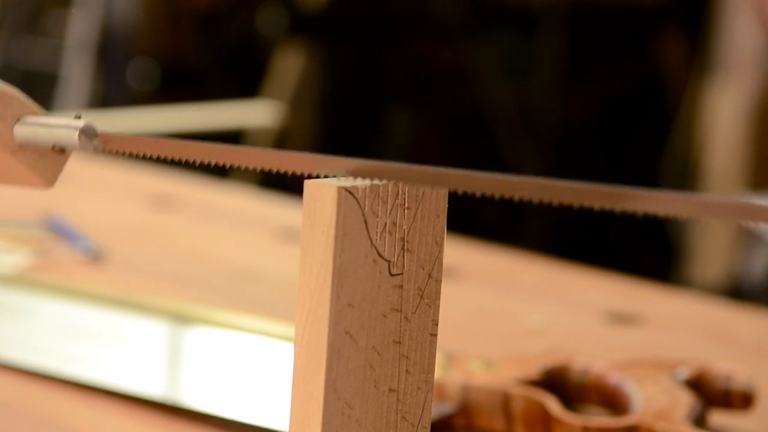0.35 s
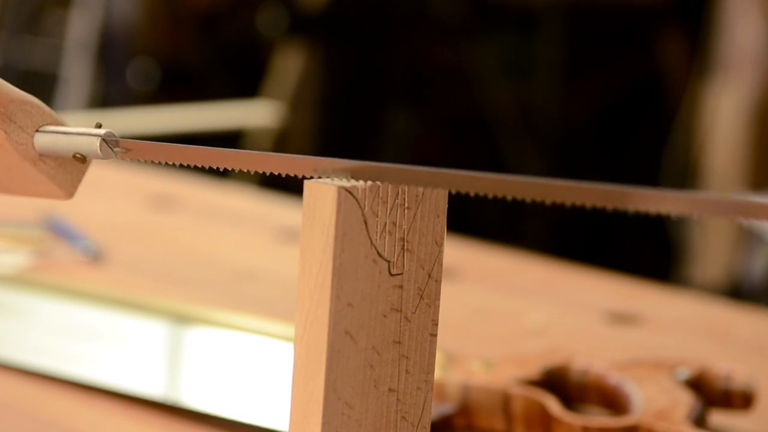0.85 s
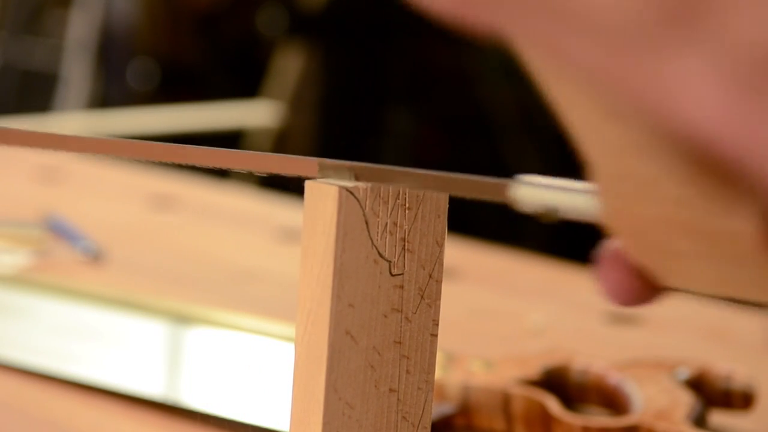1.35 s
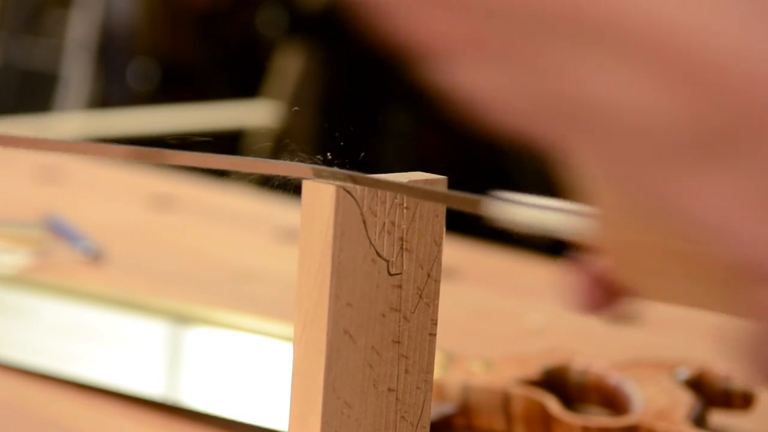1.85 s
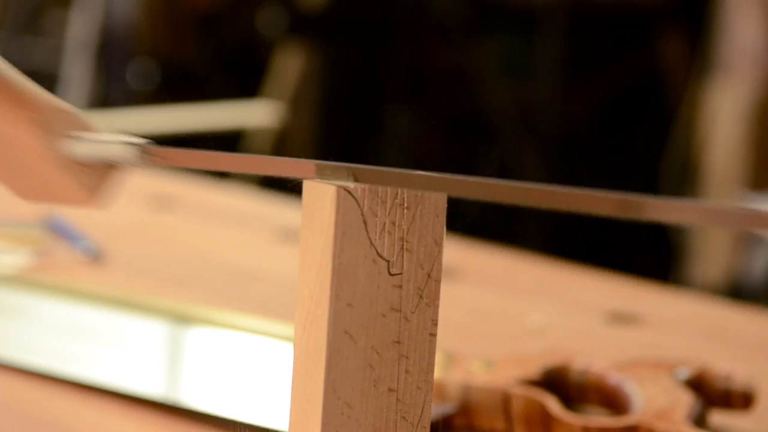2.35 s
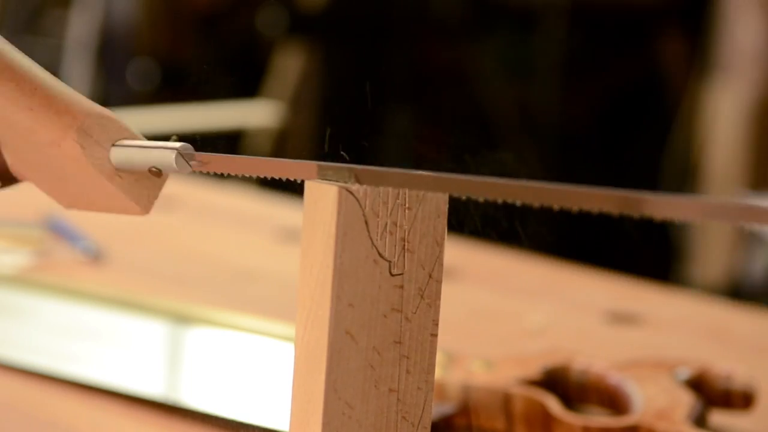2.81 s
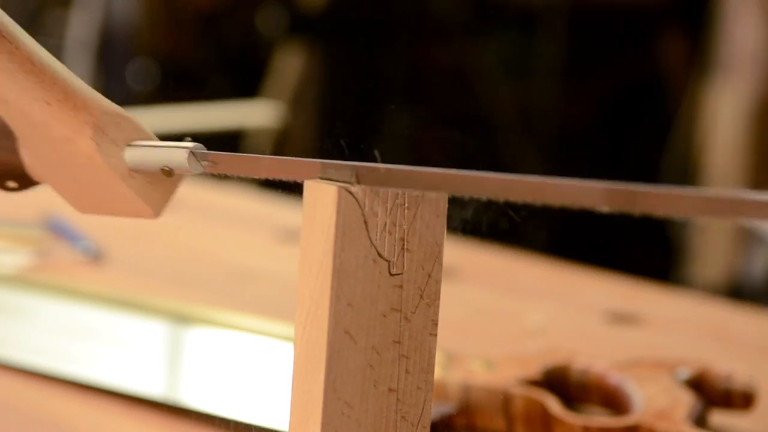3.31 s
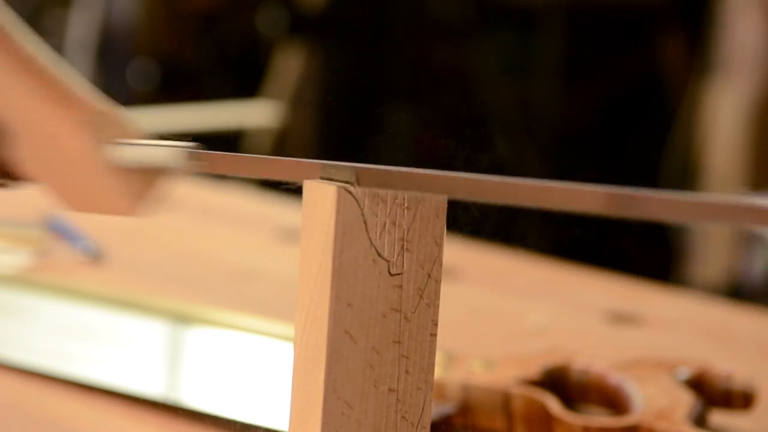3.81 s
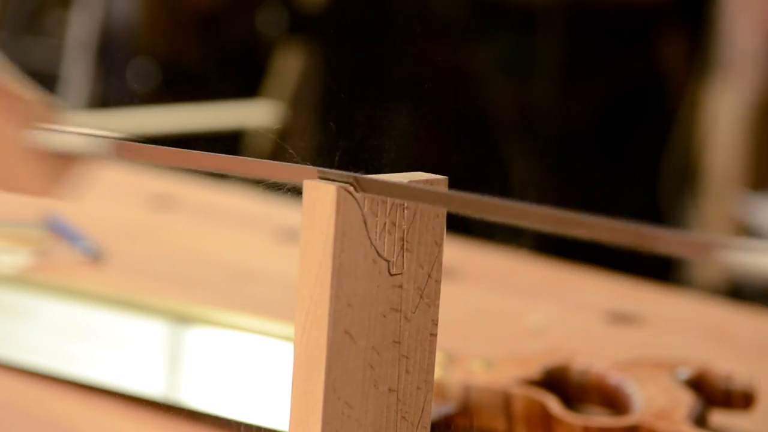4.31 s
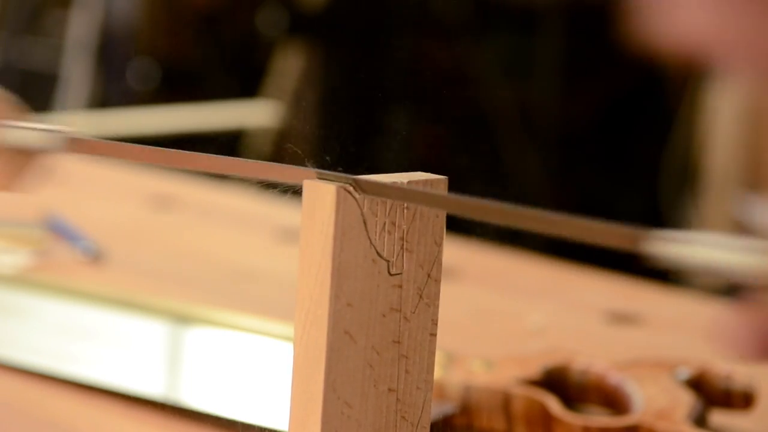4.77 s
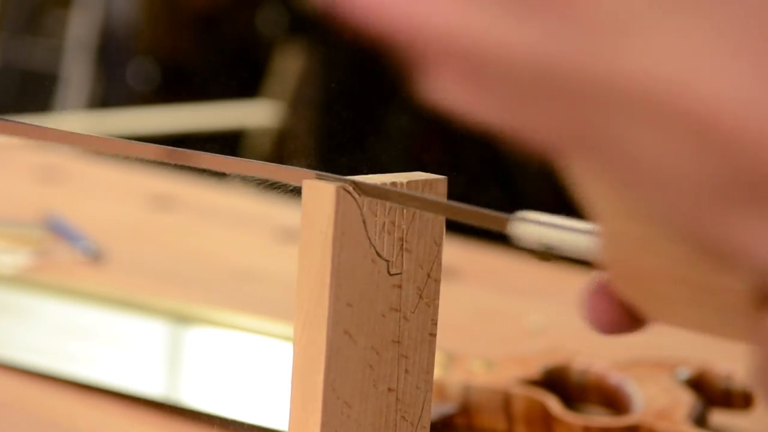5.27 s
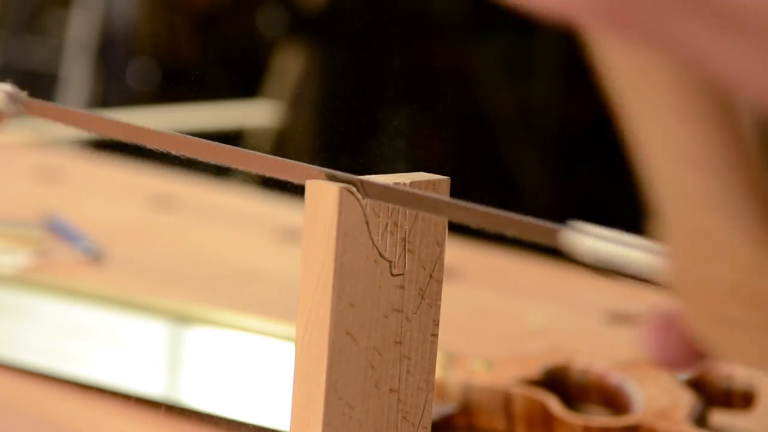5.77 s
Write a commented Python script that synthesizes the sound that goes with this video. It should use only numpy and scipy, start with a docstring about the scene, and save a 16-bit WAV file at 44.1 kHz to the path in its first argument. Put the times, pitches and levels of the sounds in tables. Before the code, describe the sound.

Light steel ticks and soft wood contact come first over a low, quiet shop hum. Then a saw bites a board in alternating push and pull strokes, slow at first and soon quick and regular. Pushes drone and rasp more; pulls are harder, with buzzing wood and less hiss. Small snags click at some turns. Close, fairly dry stereo sound with short room reflections and a low wind-like thump around two seconds.

```python
"""In a workshop, close to a two-port camera microphone, a hand bow saw is laid on the end of a clamped board.
It is nudged into place with light ticks; after a second the strokes begin, push and pull in turn.
Each tooth strikes at a rate that follows the blade speed and rings filters for the modes of board and frame;
shaped noise makes the torn fibres rasp on the steel; narrow bands sing and broad ones scrape airily at times.
Low noise from the arm's moving air buffets the ports, mostly near two seconds; the shop hums faintly all along."""
import sys
import numpy as np
from scipy import signal
from scipy.fft import rfft, irfft, next_fast_len
from scipy.io import wavfile
from scipy.ndimage import uniform_filter1d, map_coordinates

SR = 44100
rng = np.random.default_rng(int(sys.argv[2]) if len(sys.argv) > 2 else 0)


def log_audio(samples):
    """Write samples as a 16-bit WAV file to the path given in sys.argv[1]."""
    # one column per channel
    frames = np.atleast_2d(samples).T
    # limit to full scale, then quantise
    limited = np.clip(frames, -1, 1)
    pcm = np.round(limited * 32767).astype(np.int16)
    wavfile.write(sys.argv[1], SR, pcm)


def linear_from_db(decibels):
    """Turn decibels (scalar or array-like) into linear amplitude factors; 0 gives 1."""
    return 10 ** (np.asarray(decibels, float) / 20)


N = 259902  # samples, 5.9 s

# A tooth snags on the wood. Each row: time in seconds, starting level in dB before the filters.
CATCHES = [(0.055, -31), (0.7677, -54), (0.9944, -32), (1.357, -30), (1.7673, -20.5), (2.078, -27),
           (2.6617, -20), (3.166, -33), (3.6411, -24), (4.087, -33), (5.403, -37), (5.5966, -23),
           (5.8141, -32)]


def saw():
    """The teeth drive the board's drone, the frame's modes and the blade's rasp; returns two channels."""
    low_db, drone_db, rasp_db, high_db = levels()
    count = teeth_passed()
    snag = snags(CATCHES, t60=0.0064)
    clean = bites(count, jitter=0.035, scatter_db=2.5)
    blows = torn(clean, 0.2)
    drone = linear_from_db(drone_db) * board_drone(torn(clean, 0.5))
    low = linear_from_db(low_db + 0.5) * frame_low(blows)
    buzz = linear_from_db(low_db - 5.5 + 2.5 * wobble(45)) * wood_buzz(clean)
    high = linear_from_db(high_db) * frame_high(blows)
    grind = linear_from_db(0.82 * high_db + 0.27 * low_db - 3.0) * chewing(count)
    return drone + low + buzz + high + grind + knocks(snag) + rasp(count, rasp_db, snag) + singing()


# The turns of the blade. Each row: time in seconds, resting level in dB before each layer's own offset,
# pause in seconds until the teeth grip again.
TURNS = [(0.974, -63, 0.019), (1.322, -61, 0.018), (1.742, -51.5, 0.02), (2.065, -49, 0.021),
         (2.378, -40.5, 0.0046), (2.64, -47, 0.018), (2.9, -35.5, 0.014), (3.152, -48.5, 0.014),
         (3.381, -41, 0.0011), (3.627, -47.5, 0.015), (3.847, -35.5, 0.00031), (4.073, -47.5, 0.0071),
         (4.293, -37, 0.014), (4.54, -47.5, 0.00058), (4.753, -40, 0.0037), (4.965, -42, 0.0041),
         (5.18, -41.5, 0), (5.384, -38.5, 0.016), (5.613, -51, 0.011), (5.805, -46, 0.006), (6.0, -38, 0)]


def stroke_now():
    """For every sample: the number of the stroke and the share of it that has passed."""
    turn_s = np.array(TURNS)[:, 0]
    place = np.interp(np.arange(N) / SR, turn_s, np.arange(len(TURNS)))
    k = np.minimum(place.astype(int), len(STROKES) - 1)
    return k, place - k


# Share of each stroke at which the blade is fastest, one number a stroke.
FASTEST = [0.29, .5, .45, 0.3, 0.36, 0.35, 0.44, 0.3, 0.43, 0.28, 0.45, 0.42, 0.43, .35, 0.45, 0.39, 0.4,
           .35, 0.31, 0.33]
# Push, then pull. Each row: how far past the turns the arch of speed reaches before and after top speed,
# as multiples of the way to the turn.
SPEED_REACH = [(1.3, 1.15), (1.3, 1.55)]


def teeth_passed():
    """Running count of teeth: in each stroke the blade speeds up and slows down along an arch."""
    k, share = stroke_now()
    fastest = np.array(FASTEST)[k]
    before, after = np.array(SPEED_REACH)[k % 2].T
    way = toward_turn(share, fastest) / np.where(share > fastest, after, before)
    arch = np.sqrt(np.clip(1 - way ** 2, 0, 1))
    teeth_per_s = np.maximum(60.0, np.array(STROKES)[k, 1] * arch)
    return np.cumsum(teeth_per_s * (1 + 0.01877 * wobble(60))) / SR


# One stroke from each turn to the next, push and pull in turn. Each row: share of the stroke at which the
# arm eases off, top teeth per second before a slight waver, bite in dB, board drone in dB over the bite,
# rasp in dB over the bite.
STROKES = [(0.49, 230, -26.5, 5.5, -11), (0.64, 288, -23.5, 3.5, -19.5), (0.6, 263, -19.5, 3, -14),
           (0.44, 343, -21.5, 2.5, -17), (0.56, 339, -19.5, 8.5, -10), (0.59, 289, -15, 2.0, -20.5),
           (0.55, 361, -19.5, 2.5, -10), (0.64, 360, -17, -2.5, -18), (0.59, 360, -22.5, 6, -8),
           (0.6, 350, -17.5, -1, -17), (0.56, 390, -17.5, 6.5, -11.5), (0.58, 345, -13.5, 1, -17.5),
           (0.63, 358, -20.5, 8.5, -12), (0.6, 264, -16.5, 2.5, -19), (0.58, 269, -20, 3.5, -13),
           (0.51, 260, -15.5, 4, -19.5), (0.54, 280, -17.5, 5.5, -15), (0.54, 266, -19, 3.5, -19.5),
           (0.45, 340, -18.5, 6.5, -13.5), (0.43, 284, -22.5, 8, -18)]
# How squarely each layer sets in and dies away. Each row: power of the way to the turn for push in,
# push out, pull in, pull out, then the layer's offset in dB at rest.
LOW_SHAPE = (4.3, 1.36, 5.2, 1.81, 2.1)
DRONE_SHAPE = (5.3, 1.62, 6.8, 3.24, 10.2)
RASP_SHAPE = (5.0, 0.64, 7.5, 0.6, -13.5)
HIGH_SHAPE = (5.5, 0.68, 4, 0.9, -8)
# The blade is laid on the wood and nudged into place. Each row: time in seconds, bite in dB,
# board drone in dB over the bite, rasp in dB over the bite.
LAYING = [(0.0, -42.5, 1.5, -16.5), (0.078, -44.5, 15.5, -21), (0.134, -63, 17.5, -10),
          (0.251, -64.5, 4, -8), (0.694, -71, 14, -11.5), (0.745, -71, 10, -8), (0.77, -58, 13, -9),
          (0.83, -65.5, 10, -9.5), (0.96, -77, 4, -10)]
# The board booms or falls back for a moment. Each row: time in seconds, change of the drone in dB.
BOOMS = [(1.19, 6), (1.509, 7), (1.925, 10), (2.15, 5.5), (2.511, 6.5), (2.835, 2.5), (2.939, 11.5),
         (3.067, 10.5), (3.332, 5), (3.552, 6), (3.8, 3), (3.986, 0), (4.2, 4), (4.465, -3), (4.705, 3),
         (4.835, 4.5), (4.888, 9.5), (5.1, 3.5), (5.305, 0.5), (5.53, 5), (5.69, 3.5), (1.125, -19),
         (2.799, -15), (3.015, -4.5), (3.235, 2), (3.745, -12), (3.93, -7), (4.655, -9), (5.07, -8.5),
         (5.49, -8)]
# The teeth skid before they dig in fully. Each row: first touch in seconds, full grip in seconds,
# change of all the stroke's layers in dB before smoothing.
SKIDS = [(2.089, 2.107, -5), (3.636, 3.674, -5), (4.093, 4.114, -7), (5.821, 5.841, -2.5)]
# Hiss of the blade still sliding at the early turns: rasp in dB over its usual rest, one number a turn.
SLIDING = [.1, 1.5, 4.6, 6, 3]
# Change of the rasp from start to end of a stroke in dB: push, pull.
FADES_DB = (-1, -3.5)


def levels():
    """Low, drone, rasp and high layers in dB: full in mid stroke, at rest from each turn until the grip."""
    boom_s, grip_s = 0.014, 0.0036
    t = np.arange(N) / SR
    k, share = stroke_now()
    eases, _, bite_db, drone_db, rasp_db = np.array(STROKES)[k].T
    eases = eases.clip(0.1, 0.9)
    late = (share > eases).astype(int)
    nearest_turn = k + late
    turn_s, rests_db, pause_s = np.array(TURNS).T
    way = toward_turn(share, eases)
    way[t < turn_s[k] + pause_s[k]] = 1
    way = uniform_filter1d(way, int(grip_s * SR))

    drone_db = drone_db + sum(db * np.exp(-0.5 * ((t - s) / boom_s) ** 2) for s, db in BOOMS)
    high_db = -5 + 0.27 * (rasp_db + 17)  # the high modes grow with a rough tear
    rasp_db = rasp_db + np.array(FADES_DB)[k % 2] * (share - 0.5)
    skid_db = sum(db * ((t > start) & (t < end)) for start, end, db in SKIDS) * 1.0
    skid_db = uniform_filter1d(skid_db, int(grip_s * SR))
    slide_db = np.pad(SLIDING, (0, len(TURNS)))[nearest_turn]
    laid_db, laid_drone_db, laid_rasp_db = curves(LAYING)

    def layer(over_db, shape, laid_over_db, slid_db=0):
        """One layer's level: the stroke's, or the laying's before the first turn."""
        full_db = bite_db + over_db
        rest_db = rests_db[nearest_turn] + slid_db + shape[-1]
        power = np.array(shape)[2 * (k % 2) + late]
        stroke_db = skid_db + full_db + (rest_db - full_db) * way ** power
        return np.where(t > turn_s[0], stroke_db, laid_db + laid_over_db)

    return [layer(0, LOW_SHAPE, 0), layer(drone_db, DRONE_SHAPE, laid_drone_db),
            layer(rasp_db, RASP_SHAPE, laid_rasp_db, slide_db), layer(high_db, HIGH_SHAPE, -17)]


# Left-set teeth over right-set teeth in dB: push, pull.
SET_DB = (7.5, 2.5)


def bites(count, jitter, scatter_db):
    """One blow per tooth, uneven in time and size, left-set and right-set teeth unlike."""
    tooth = np.arange(1, int(count[-1]))
    chance = rng.standard_normal((len(tooth), 2))
    at = np.searchsorted(count, tooth + jitter * chance[:, 0]).clip(0, N - 1)
    stroke = stroke_now()[0][at]
    set_db = np.array(SET_DB)[stroke % 2] * (tooth % 2 - 0.5)
    return unit(np.bincount(at, linear_from_db(scatter_db * chance[:, 1] + set_db), N))


def torn(blows, share):
    """Blows over the noise of tearing fibres, which holds this share of the power."""
    return np.sqrt(1 - share) * blows + np.sqrt(share) * rng.standard_normal(N)


# Bending of the clamped board. Each row: frequency in Hz, width in Hz, relative level in dB.
BOARD = [(206, 14.4, -13), (239.5, 24.6, -3), (251.7, 18, 3.5), (325.8, 15, -2)]


def board_drone(drive):
    """The board's bending modes, favoured around 280 Hz, ring together as a drone."""
    modes = [lambda f, one=one: one(f) * mode(f, 280, 210) for one in resonances(BOARD)]
    return held(rung(drive, modes, drift_db=4.5, rate=40), firm=0.76, span_s=0.044)


# Higher modes of board and saw frame. Each row: frequency in Hz, width in Hz, relative level in dB.
FRAME = [(448.1, 12, 1.5), (506, 35.7, 4), (585, 10.3, 3.5), (655, 86, -7), (785.6, 19, -3), (857, 17, -8),
         (940, 24, -7.5), (981.4, 5.3, 0), (1026, 17, -10), (1190, 400, -22), (1388, 27, -15.5),
         (1600, 92, -14), (1734, 43, -5), (1832, 63, -8), (2055, 234, -16.5), (2090, 270, -22),
         (2557, 75, -16), (2752, 81, -9.5), (2782, 190, -12), (3036, 71, -21.5)]


def frame_low(drive):
    """The nine lowest modes of board and frame, rung by the teeth."""
    return held(rung(drive, resonances(FRAME)[:9], drift_db=3.5, rate=22), firm=0.71, span_s=0.056)


def frame_high(drive):
    """The modes above the nine lowest, less firmly damped."""
    return held(rung(drive, resonances(FRAME)[9:], drift_db=4, rate=8), firm=0.25, span_s=0.023)


def knocks(snag):
    """A snagging tooth knocks all the higher modes of board and frame at once."""
    return filtered(linear_from_db(21.5) * snag, lambda f: sum(one(f) for one in resonances(FRAME)))


# Broad response of the wood to each tooth. Each row: frequency in Hz, width in Hz of each of two
# resonances in a row, relative level in dB.
BODY = [(566.5, 330, 7), (980, 520, -5.5), (1450, 660, -11.5)]


def wood_buzz(clean):
    """The bare blows of the teeth through the broad response of the wood."""
    return unit(filtered(clean, lambda f: sum(linear_from_db(db) * mode(f, hz, width) ** 2 for hz, width, db in BODY)))


# Coarse chewing of the wood. Each row: frequency in Hz, relative spectrum level in dB.
GRIND = [(500, -14), (900, -2.5), (1400, 0.5), (2300, -4), (3600, -9), (5500, -26)]


def chewing(count):
    """Strongly pulsing, gritty tearing noise, about half of it shared by the two ports."""
    noise = tearing(count, pulse_db=3.5, grit_db=4, patchy_db=3, apart=0.95)
    spectrum = [(200, -90)] + GRIND + [(9000, -92)]
    return unit(filtered(noise, lambda f: linear_from_db(along(spectrum, f))))


# Colour of the rasp. Each row: frequency in Hz, relative spectrum level in dB.
RASP = [(1470, -42), (2500, -4.5), (2780, 0.5), (3480, -23), (3730, -8.5), (5110, -6), (5910, -9),
        (12300, -20.5), (15700, -33)]
# Ringing of the steel blade. Each row: frequency in Hz, width in Hz, level in dB over the rasp before a
# common 3 dB cut.
BLADE = [(3756, 41, 0), (4150, 52, -5), (4480, 86, -2.5), (5030, 91, -2.5), (5380, 36, 1.5),
         (8100, 1330, 2.5), (10540, 64, 5.5), (12100, 230, 2)]
# The steel ticks lightly. Each row: time in seconds, starting level in dB before a lift and the filters.
TICKS = [(.02, -37), (.057, -36), (.118, -33), (.296, -48), (.371, -37), (.535, -44), (1.212, -24),
         (1.345, -31), (1.414, -25), (1.782, -19), (2.099, -27)]


def rasp(count, rasp_db, snag):
    """Torn fibres, snags and ticks scrape the steel, whose own modes ring along."""
    def colour(f):
        return linear_from_db(along([(1500, -54)] + RASP, f))

    fibres = tearing(count, pulse_db=2.0, grit_db=2.3, patchy_db=1.5, apart=0.55)
    scrape = linear_from_db(rasp_db + 16) * fibres + linear_from_db(5.0) * snag + linear_from_db(5.5) * snags(TICKS, t60=0.0033)
    blade = [lambda f, hz=hz, width=width, db=db: linear_from_db(db) * mode(f, hz, width) * colour(f)
             for hz, width, db in BLADE]
    return filtered(scrape, colour) + linear_from_db(-3) * rung(scrape, blade, drift_db=5, rate=7)


def tearing(count, pulse_db, grit_db, patchy_db, apart):
    """Noise that swells at every tooth, crackles and flares in patches; each port gets partly its own."""
    swell_db = pulse_db * np.cos(2 * np.pi * count) + grit_db * wobble(900)
    swell_db = swell_db + 2.1 * wobble(70) + 1.27 * wobble(170)
    noise = rng.standard_normal(N) + apart * rng.standard_normal((2, N))
    z = signal.stft(noise, nperseg=512)[2]
    # patches: random gains smoothed over frequency and time
    patches = uniform_filter1d(rng.standard_normal(z.shape[1:]), 8, 0)
    patches = uniform_filter1d(patches, 10, 1)
    patchy = signal.istft(z * linear_from_db(patchy_db * unit(patches)), nperseg=512)[1][:, :N]
    return unit(linear_from_db(swell_db) * patchy)


def snags(events, t60):
    """Single sharp blows, each a few ms of dying noise."""
    out, t = np.zeros(N + SR), np.arange(SR // 50) / SR
    for s, db in events:
        out[round(s * SR):][:len(t)] += linear_from_db(db - 60 * t / t60) * rng.standard_normal(len(t))
    return out[:N]


# The blade sings or scrapes airily. Each row: start in seconds, end in seconds, frequency in Hz, width in
# Hz of each of two resonances in a row, level in dB at the top of the swell before flutter.
SING = [(.08, .66, 1850, 260, -71), (.02, .42, 4060, 400, -75), (1.03, 1.13, 5200, 400, -41),
        (1.4, 1.49, 5000, 350, -38), (1.66, 1.79, 8500, 8000, -49), (1.99, 2.11, 9500, 8000, -53),
        (3.243, 3.262, 3850, 450, -23), (3.27, 3.29, 3750, 150, -32), (3.96, 4.04, 5000, 80, -36),
        (5.21, 5.31, 10600, 250, -43)]


def singing():
    """Narrow or broad fluttering noise bands under a smooth swell."""
    t, out = np.arange(N) / SR, np.zeros(N)
    for start, end, hz, width, db in SING:
        share = np.clip((t - start) / (end - start), 0, 1)
        swell = np.abs(np.sin(np.pi * share)) ** 0.5
        band = unit(filtered(rng.standard_normal(N), lambda f: mode(f, hz, width) ** 2))
        out += linear_from_db(db + 4.4 * wobble(45)) * swell * band
    return out


def rung(drive, modes, drift_db, rate):
    """The moving point of contact feeds each mode more or less from moment to moment."""
    return sum(filtered(linear_from_db(drift_db * wobble(rate)) * drive, one) for one in modes)


def held(x, firm, span_s):
    """The pressing blade damps the wood: strong ringing is evened out over a short span."""
    power = uniform_filter1d(np.mean(np.atleast_2d(unit(x)) ** 2, 0), int(span_s * SR))
    return unit(x * (np.abs(power) + 0.023) ** (-firm / 2))


# Balance of the two microphone ports. Each row: frequency in Hz, left over right in dB.
PORTS = [(150, 0.2), (300, .6), (700, 1.6), (1500, 1), (4400, -1), (8000, -1), (15000, 8)]


def ports(pair, lag_s, above_hz):
    """The left port hears the saw a little later; the lag shrinks below above_hz, where it is half."""
    def response(f):
        gain = linear_from_db(along(PORTS, f) * [[0.5], [-0.5]])
        lag = lag_s * f / (f + above_hz) * np.array([[1], [0]])
        return gain * np.exp(-2j * np.pi * f * lag)

    return filtered(pair, response)


def bench(x):
    """Quick reflections off the bench and vice reach each port differently."""
    t = np.arange(SR // 30) / SR
    echoes = rng.standard_normal((2, len(t))) * linear_from_db(-60 * t / 0.033)
    delayed = np.pad(x, (40, 0))[None]  # 40 samples, 0.9 ms
    near = signal.fftconvolve(delayed, echoes / np.linalg.norm(echoes[0]), axes=1)[:, :N]
    spectrum = [(450, -60), (800, -11), (1300, -4), (2400, -11), (8000, -9)]  # Hz, dB
    return filtered(near, lambda f: linear_from_db(along(spectrum, f)))


# Dying away of the workshop. Each row: frequency in Hz, time to fall 60 dB in seconds.
ROOM = [(200, 0.083), (2000, 0.12), (12000, 0.24)]


def room(x):
    """A new diffuse tail for every fifth of a second and each port, each frequency dying at its own speed."""
    out, hop = np.zeros((2, N + SR)), SR // 5
    for start in range(0, N, hop):
        hz, t, z = signal.stft(rng.standard_normal((2, SR // 3)), SR, nperseg=256)
        decay = linear_from_db(-60 * t / along(ROOM, hz)[:, None])
        tail = signal.istft(z * decay, SR, nperseg=256)[1]
        wet = signal.fftconvolve(x[None, start:start + hop], tail / np.linalg.norm(tail[0]), axes=1)
        out[:, start + 200:][:, :wet.shape[1]] += wet  # 200 samples, 4.5 ms late
    spectrum = [(300, -57), (1500, -7.5), (8000, -4.5)]  # Hz, dB
    return filtered(out[:, :N], lambda f: linear_from_db(along(spectrum, f)))


# Strength of the buffeting. Each row: time in seconds, level in dB before a common lift,
# left over right in dB.
BUFFET = [(0.9, -67, 1.5), (1.65, -52, 4), (1.79, -51, -8), (1.9, -25.5, -27), (2.09, -26, -4),
          (2.26, -24.5, -12), (2.41, -46, -10), (2.54, -37.5, 8), (2.86, -55, 1), (3.1, -46, 3),
          (3.5, -53, 0), (3.9, -42, 2), (4.15, -49, 3), (4.4, -42, 2), (4.7, -58, 5), (5.3, -45, -2),
          (5.5, -51, -2), (5.89, -54, 1)]
# Colour of the moving air. Each row: frequency in Hz, relative spectrum level in dB.
GUST = [(12, -32), (22, -4.5), (38, -3.5), (70, -9), (170, -15), (260, -39), (400, -26), (800, -90)]


def buffet():
    """Air pushed by the arm thumps on each port partly separately, often on one more than the other."""
    level_db, pan_db = curves(BUFFET)
    noise = rng.standard_normal((2, N)) + 0.6 * rng.standard_normal(N)
    low = unit(filtered(noise, lambda f: linear_from_db(along(GUST, f))))
    lumps = linear_from_db(3 * np.array([wobble(25), wobble(25)]))
    share = linear_from_db(pan_db * np.array([[0.5], [-0.5]]))
    return linear_from_db(level_db + 9.5) * lumps * low * share / share.sum(0)


# Colour of the shop's background. Each row: frequency in Hz, relative spectrum level in dB.
SHOP = [(15, -14.5), (30, -2.5), (60, -3.5), (95, -13), (160, -16.5), (300, -29), (950, -35.5), (1700, -44),
        (2700, -55.5), (15700, -60.5)]


def shop():
    """Nearly steady shaped noise, mostly alike at both ports, with a wavering 121 Hz hum."""
    own, shared = rng.standard_normal((2, N)), rng.standard_normal(N)
    hiss = unit(filtered(own + 9.1 * shared, lambda f: linear_from_db(along(SHOP, f))))
    hum = linear_from_db(-56 + 3 * wobble(6)) * np.sin(2 * np.pi * 121 * np.arange(N) / SR)
    return linear_from_db(-41 + 0.22 * wobble(2.45)) * hiss + hum


def toward_turn(share, middle):
    """0 at the middle of a stroke, 1 at either turn."""
    return np.where(share > middle, (share - middle) / (1 - middle), 1 - share / middle)


def unit(x):
    """Scaled to rms 1."""
    return x / np.sqrt(np.mean(x ** 2) + 1e-20)


def along(points, hz):
    """(Hz, value) points joined on a log axis."""
    f, v = np.transpose(points)
    return np.interp(np.log(hz + 1), np.log(f + 1), v)


def curves(rows):
    """One value per sample for each column after the time."""
    s, *cols = np.transpose(rows)
    return [np.interp(np.arange(N) / SR, s, c) for c in cols]


def wobble(rate):
    """A smooth random curve, rate knots a second."""
    knots = rng.standard_normal(int(N * rate / SR) + 4)
    return map_coordinates(knots, [np.arange(N) * rate / SR])


def filtered(x, response):
    """x through a complex response of frequency."""
    m = next_fast_len(N + SR // 2)
    return irfft(rfft(x, m) * response(np.fft.rfftfreq(m, 1 / SR)), m)[..., :N]


def mode(f, hz, width):
    """A causal resonance of peak gain 1."""
    return 1j * f * width / (hz * hz - f * f + 1j * f * width)


def resonances(rows):
    """Modes as functions of frequency, neighbours in opposite phase."""
    return [lambda f, sign=(-1) ** k, hz=hz, width=width, db=db: sign * linear_from_db(db) * mode(f, hz, width)
            for k, (hz, width, db) in enumerate(rows)]


def scene():
    """Saw, bench, room, air on the ports and the shop."""
    cut = saw()
    middle = cut.mean(0)
    return ports(cut, lag_s=8e-5, above_hz=750) + bench(middle) + room(middle) + buffet() + shop()


def top_cut(x):
    """Nothing passes above the cut-off."""
    return signal.sosfilt(signal.butter(12, 15810, fs=SR, output="sos"), x)


def record(dry):
    """The microphone's recorder bends the loudest peaks softly below 1.1 times full scale."""
    squeezed = dry / (1 + np.abs(dry / 1.1) ** 6) ** (1 / 6)
    return top_cut(squeezed)


dry = scene()
out = record(dry)
log_audio(out)
```